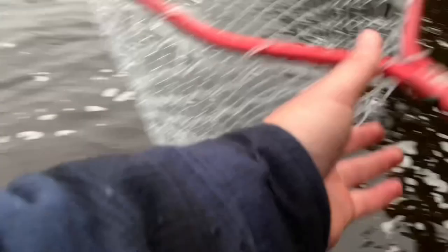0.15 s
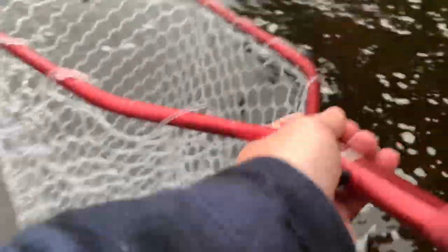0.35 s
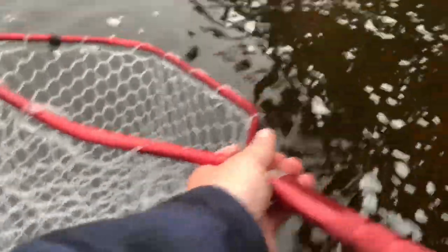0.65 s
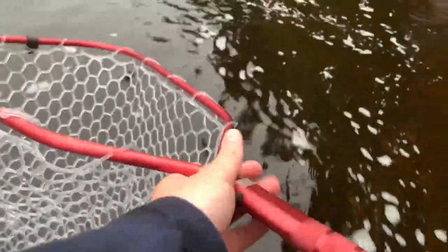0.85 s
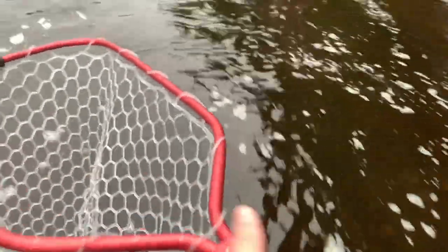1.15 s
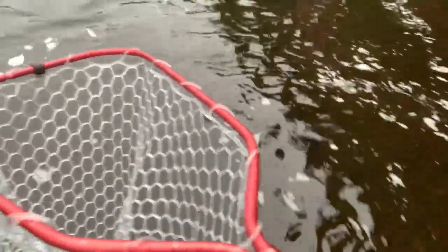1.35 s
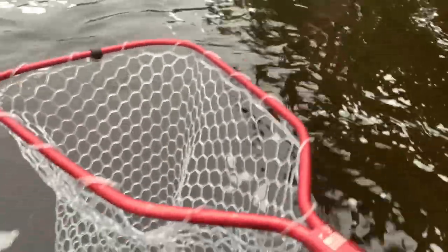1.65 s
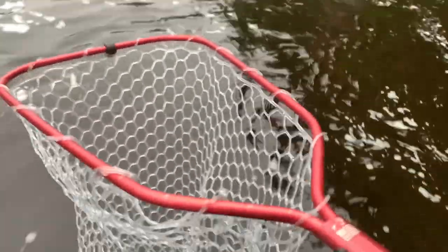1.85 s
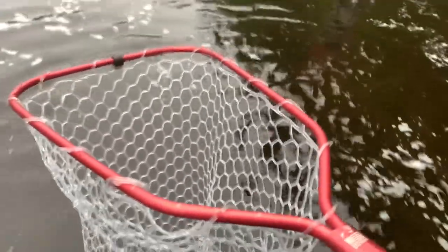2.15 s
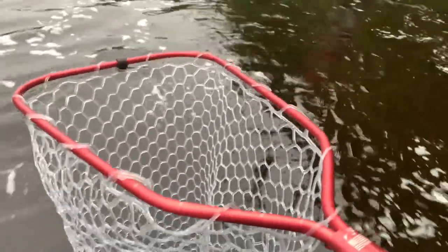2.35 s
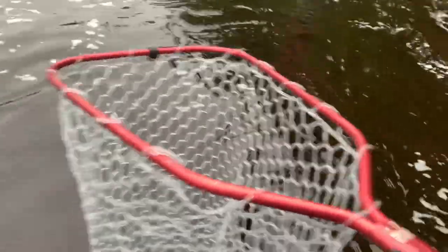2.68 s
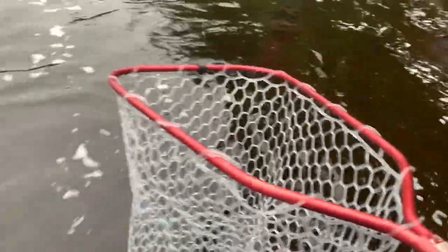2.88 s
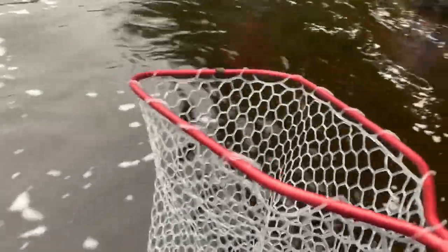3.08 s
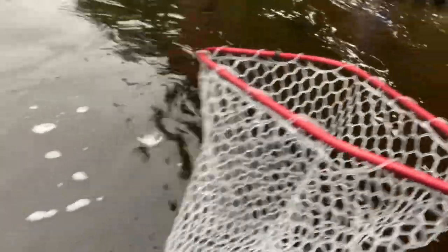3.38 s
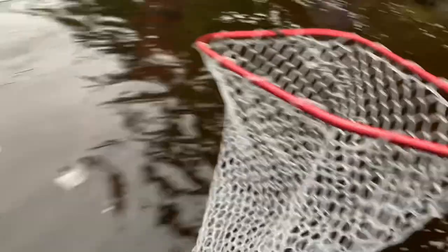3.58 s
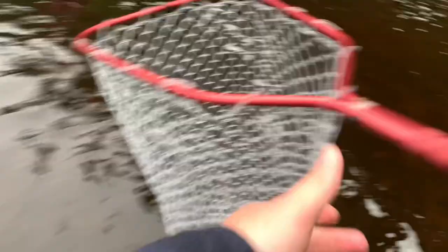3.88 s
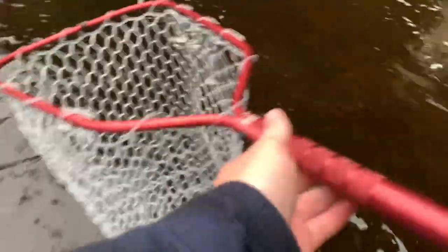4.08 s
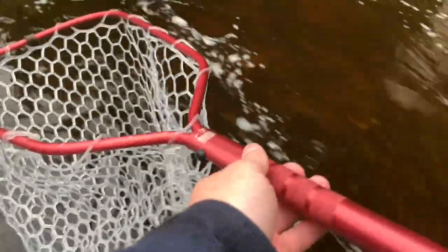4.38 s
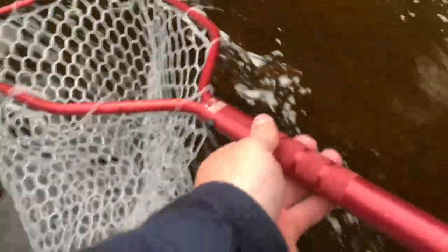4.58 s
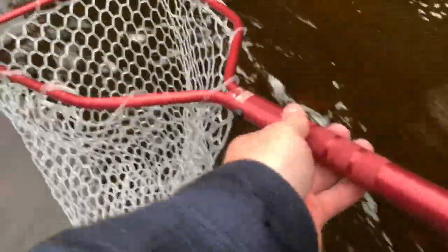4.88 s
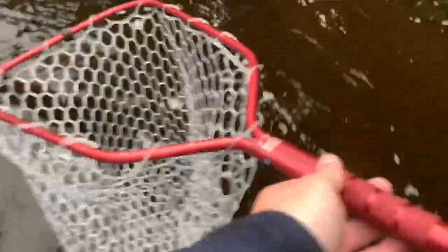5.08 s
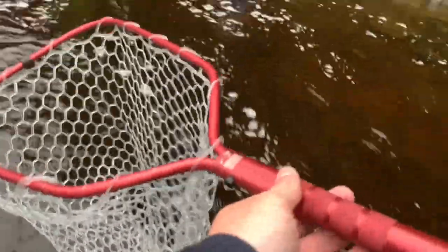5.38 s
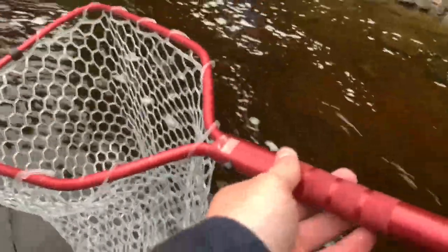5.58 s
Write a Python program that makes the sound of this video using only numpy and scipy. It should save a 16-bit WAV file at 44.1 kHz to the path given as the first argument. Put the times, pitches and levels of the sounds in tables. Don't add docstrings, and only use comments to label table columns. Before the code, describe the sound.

Outdoors at a river, very close to a camera microphone, the current roars low and lumpy without pause. Sleeve and wet mesh rustle, drops plop, and one hollow handle knock lands early, followed by tiny metallic pings. A quieter dripping stretch leads to a loud cluster of knocks and cracks, then churning water with snapping splashes and low gulps.

```python
import sys
import numpy as np
from scipy import signal
from scipy.fft import rfft, irfft, next_fast_len
from scipy.io import wavfile
from scipy.ndimage import uniform_filter1d, minimum_filter1d, map_coordinates

SR = 44100
rng = np.random.default_rng(int(sys.argv[2]) if len(sys.argv) > 2 else 0)


def digitize_waveform(pressure):
    field = np.atleast_2d(pressure).T
    bounded = np.clip(field, -1, 1)
    quanta = np.round(bounded * 32767).astype(np.int16)
    wavfile.write(sys.argv[1], SR, quanta)


def makeup_ratio(level_db):
    decades = np.asarray(level_db, float) / 20
    return 10 ** decades


N = 253134


def unit(x):
    return x / np.sqrt(np.mean(x ** 2) + 1e-20)


def along(points, hz):
    f, v = np.transpose(points)
    return np.interp(np.log(hz + 1), np.log(f + 1), v)


def curves(rows):
    s, *cols = np.transpose(rows)
    return [np.interp(np.arange(N) / SR, s, c) for c in cols]


def wobble(rate):
    return map_coordinates(rng.standard_normal(int(N * rate / SR) + 4), [np.arange(N) * rate / SR])


def filtered(x, response):
    m = next_fast_len(N + SR // 2)
    return irfft(rfft(x, m) * response(np.fft.rfftfreq(m, 1 / SR)), m)[..., :N]


def lead(hz, seconds):
    return np.exp(1j * np.pi * hz * seconds * np.array([[1], [-1]]))


def both_db(a_db, b_db):
    return 10 * np.log10(makeup_ratio(2 * a_db) + makeup_ratio(2 * b_db))


def add(track, s, sound, pan_db):
    at = round(s * SR)
    track[:, at:at + len(sound)] += (sound * makeup_ratio([[pan_db / 2], [-pan_db / 2]]))[:, :N - at]


# (frequency [Hz], correlation [-1..1])
ALIKE = [(50, 0.85), (130, 0.99), (290, 0.91), (640, 0.34), (1400, 0.75), (3000, -0.15), (4500, -0.25),
         (16000, 0.55)]


def rush(spectrum, patchy_db, grains=0, spread_db=0, share=0, left_first=0):
    z = signal.stft(rng.standard_normal((2, N)), nperseg=512)[2]
    field = uniform_filter1d(uniform_filter1d(rng.standard_normal(z.shape[1:]), 6, 0), 8, 1)
    pair = unit(signal.istft(z * makeup_ratio(patchy_db * unit(field)), nperseg=512)[1][:, :N])
    sizes = makeup_ratio(spread_db * np.minimum(rng.exponential(size=N), 3.5))
    spikes = (rng.random(N) < grains / SR) * sizes
    pair = pair + share * unit(spikes * rng.standard_normal((2, N)))

    def turn(hz):
        return np.arccos(np.clip(along(ALIKE, hz), -1, 1)) / 2

    mid, side = filtered(pair, lambda hz: makeup_ratio(along(spectrum, hz)) * [np.cos(turn(hz)), np.sin(turn(hz))])
    return unit(filtered(np.array([mid + side, mid - side]), lambda hz: lead(hz, left_first)))


def bubbles(count, centre_hz, cycles, spread_db, size=640, scatter=0.519):
    when, side, bulk = rng.random((3, count))
    hz = np.clip(centre_hz * np.exp(scatter * rng.standard_normal(count)), 250, 9000)[:, None]
    t = np.arange(size) / SR
    age = t * hz / cycles
    rings = age * np.exp(-3 * age) * np.sin(2 * np.pi * hz * t * (1 + 0.074 * age))
    grains = makeup_ratio(-spread_db * np.log(bulk + 0.095))[:, None] * rings
    at = ((when * N).astype(int)[:, None] + np.arange(len(t))).ravel()
    sides = [np.bincount(at, (grains * w[:, None]).ravel(), N + len(t))[:N] for w in (0.21 + side, 1.3 - side)]
    return unit(np.array(sides))


def rising_bubbles(rows, rise):
    out, t = np.zeros((2, N)), np.arange(SR // 8) / SR
    for s, db, hz, t60 in rows:
        turns = hz * (t + rise * t * t / t60)
        envelope = makeup_ratio(db + 0.5 - 60 * t / t60) * (1 - np.exp(-t / 0.00062))
        add(out, s, envelope * np.sin(2 * np.pi * turns), pan_db=1.5)
    return out


def clicks(rows, gain_db, width):
    out, t = np.zeros((2, N)), np.arange(2048) / SR
    f = np.fft.rfftfreq(len(t), 1 / SR)
    for s, db, hz, t60, pan_db in rows:
        band = width * hz * np.sqrt(hz / 4000)
        burst = makeup_ratio(-60 * t / t60) * (1 - np.exp(-t / 0.00063)) * rng.standard_normal(len(t))
        burst = irfft(rfft(burst) * (1j * f * band / (hz * hz - f * f + 1j * f * band)) ** 2)
        add(out, s, makeup_ratio(db + gain_db) * burst / np.abs(burst).max(), np.clip(pan_db, -7, 7))
    return out


# (time [s], strength [dB])
STIR = [(0, -43.5), (.3, -41), (.48, -47.5), (.75, -42), (1.05, -42), (1.4, -43), (2.09, -48), (2.4, -46),
        (2.59, -45), (2.95, -47.5), (3.29, -45), (3.5, -39.5), (3.69, -41), (3.9, -40.5), (4.1, -38),
        (4.8, -36), (5.35, -38.5), (5.74, -36.5)]
# (peak time [s], strength [dB], rise [s per 10 dB], fall [s per 10 dB])
SURGES = [(.09, -40, 0.065, .08), (0.2, -35.5, 0.054, 0.08), (.27, -41.5, 0.054, 0), (.93, -36, 0.2, -0.01),
          (4.425, -30.5, 0.11, 0.23), (4.57, -32, 0.12, 0.09), (4.69, -34.5, 0.046, 0.13),
          (5.04, -31, 0.089, 0.2), (5.136, -28.5, 0.082, 0.08), (5.24, -39, 0.027, 0.02),
          (5.41, -34, 0.083, 0.1)]


def stirring():
    t, (level_db,) = np.arange(N) / SR, curves(STIR)
    surges = 0
    for s, db, rise, fall in SURGES:
        surges = surges + makeup_ratio(2 * np.interp(t, [s - 3 * rise, s, s + 3 * fall], [db - 30, db, db - 30]))
    return 10 * np.log10(makeup_ratio(2 * level_db) + surges) + 35


# (time [s], level [dB])
CURRENT = [(0, -32), (.25, -30.5), (.38, -32), (.6, -32), (.95, -35.5), (1.79, -31.5), (3.05, -33),
           (3.64, -33.5), (4.2, -36), (4.85, -33.5), (5.13, -29), (5.33, -33), (5.74, -31.5)]
# (frequency [Hz], density [dB per Hz])
RUMBLE = [(13, -62), (22, -46), (52, -4.5), (184, 0.5), (354, -7), (432, -11), (594, -16), (646, -19),
          (918, -27.5), (1200, -23.5), (1560, -27), (2640, -120)]
# (frequency [Hz], density [dB per Hz])
BODY = [(120, -42), (220, 4.5), (330, 3.5), (480, -1), (700, -8), (1200, -63.5)]


def river():
    current_db, = curves(CURRENT)
    low_db = current_db + 0.5
    drag_db = -39.5 + 1.85 * stirring()
    body_db = both_db(current_db - 3.5, drag_db)
    tumble = makeup_ratio(0.12 * wobble(7) + 1.1 * wobble(35))
    low = unit(tumble * rush(RUMBLE, patchy_db=-1.0, left_first=0.00037))
    lumps = makeup_ratio(.8 * wobble(14) + 1.8 * wobble(40))
    body = rush(BODY, patchy_db=4.0, grains=300, spread_db=3.5, share=0.89, left_first=0.000097)
    return makeup_ratio(low_db) * low + makeup_ratio(body_db) * unit(lumps * body) * makeup_ratio([[.9], [-.9]])


# (time [s], strength [dB])
RUB = [(0.0, -54), (.36, -55.5), (.41, -48), (0.73, -48.5), (.82, -57.5), (1.18, -53), (1.37, -60),
       (1.84, -59.5), (2.06, -65.5), (2.3, -60.5), (3.02, -59), (3.58, -51.5), (4.08, -51.5), (4.59, -47),
       (4.73, -51.5), (5.31, -50.5), (5.5, -52), (5.74, -53.5)]
# (time [s], level [dB])
TRICKLE = [(0, -6), (.35, -4), (1, -8), (2.2, -11), (2.5, -7), (2.8, -8), (3.3, -9), (3.55, -3.5),
           (3.75, -9), (4, -9.5), (5.74, -13.5)]
# (frequency [Hz], density [dB per Hz])
SWISH = [(150, -51), (300, 0), (500, -1.5), (900, -2), (1500, -9.5), (2400, -15.5), (4000, -78)]
SCRATCH = [(1200, 1.5), (2200, 2), (2900, 2), (4000, 1.5), (4700, -1), (5500, -8.5), (7000, -10),
           (9000, -52)]
HISS = [(4500, -20.5), (6500, -9), (7700, -10), (9000, -2.5), (11000, -9.5), (14000, -6.5), (15800, -10),
        (16400, -44)]


def rustle():
    stir_db, rub_db = stirring(), curves(RUB)[0] + 50
    swish_db = -35.5 + 1.26 * stir_db
    scratch_db = -40.5 + 0.94 * stir_db + 0.46 * rub_db
    hiss_db = -46 + 1.25 * rub_db + 0.57 * stir_db
    clumps = .15 * wobble(16) + .8 * wobble(60)

    swish = rush(SWISH, patchy_db=3.0, grains=420, spread_db=7, share=0.19, left_first=.00008)
    swish = swish + 0.41 * bubbles(count=1500, centre_hz=1090, cycles=4.2, spread_db=2.5)
    trickle = bubbles(count=750, centre_hz=1220, cycles=11.1, spread_db=1.5, size=900, scatter=0.251)
    swish = swish + makeup_ratio(curves(TRICKLE)[0]) * trickle
    scratch = rush(SCRATCH, patchy_db=1.3, grains=500, spread_db=3.5, share=0.4)
    scratch = scratch + 0.35 * bubbles(count=4000, centre_hz=3460, cycles=4.8, spread_db=0.0)
    hiss = rush(HISS, patchy_db=1.7, grains=900, spread_db=3, share=0.3)

    swish_db = swish_db + 2.0 + .8 * clumps
    scratch_db = scratch_db + 4.0 + clumps + 1.27 * wobble(25.01)
    hiss_db = hiss_db + 7.0 + 1.9 * clumps + 2.4 * wobble(14) + 0.16 * wobble(3.07)
    return makeup_ratio(swish_db) * swish * makeup_ratio([[.6], [-.6]]) + makeup_ratio(scratch_db) * scratch + makeup_ratio(hiss_db) * hiss


# (time [s], peak [dB], bubble pitch [Hz])
DROPS = [(0.047, -26.5, 1330), (0.116, -27, 920), (.219, -38, 890), (0.255, -26, 1040), (0.348, -28, 1350),
         (0.495, -22, 320), (0.636, -18, 490), (4.016, -22, 1304), (0.92, -26, 1145), (1.178, -20, 1570),
         (1.213, -28, 614), (1.77, -30.5, 1010), (2.258, -35, 1270), (3.12, -36.5, 1970), (2.427, -29, 860),
         (2.474, -31, 1010), (2.574, -30, 950), (2.618, -39, 1130), (2.68, -29, 363), (3.237, -31.5, 1749),
         (3.274, -29, 1120), (3.34, -26, 1366), (3.418, -29, 1261), (3.499, -29, 1130), (3.542, -27, 1210),
         (3.665, -26, 1240), (4.558, -18, 504), (4.687, -15, 368), (5.589, -31, 357), (5.708, -26, 1530),
         (2.3, -47, 837), (2.352, -44, 1300), (2.38, -38.5, 1340), (2.54, -37, 1090), (2.585, -26.5, 715),
         (2.754, -39, 1050), (2.917, -47, 870), (3.202, -46, 1270), (3.24, -31, 606), (3.314, -36, 756),
         (3.636, -33, 1330), (0.189, -28, 1040), (.22, -30, 1890), (.3, -28, 910), (.795, -31, 1330),
         (.89, -31, 1110), (0.994, -38, 1450)]


def drops():
    return rising_bubbles([(s, db, hz, 0.038) for s, db, hz in DROPS], rise=0.18)


# (time [s], peak [dB], centre [Hz], pan [dB])
SPRAY = [(.0625, -24, 7500, 7), (1.059, -48, 7650, -4), (1.1004, -22.5, 9100, 7), (1.11, -39, 7800, 4),
         (1.1772, -24, 7850, -8), (1.3159, -27, 11000, 2.5), (1.3518, -30.5, 11000, 7),
         (1.8328, -30, 10200, 0), (1.9385, -35, 12000, 8), (2.3471, -28, 10000, 5), (2.718, -32, 10300, 3),
         (2.9025, -35, 9680, 8), (3.1133, -29, 10200, 2), (4.343, -18, 7200, -12),
         (4.8115, -34, 15200, 1.2), (5.0667, -14, 9500, 7), (5.4904, -26, 7570, -6),
         (5.5767, -31, 15500, -11)]


def spray():
    return clicks([(s, db, hz, 0.011, pan_db) for s, db, hz, pan_db in SPRAY], gain_db=-4, width=.38)


# (time [s], peak [dB], centre [Hz], pan [dB])
STRANDS = [(.0625, -26, 3200, 0), (.1216, -25, 2810, .5), (.2588, -33, 2200, 0), (0.3358, -29, 2060, 0),
           (.355, -36, 7200, 0), (.392, -36, 5030, 0), (0.4496, -31, 2400, 8), (.466, -30, 3280, 4),
           (0.5246, -28.5, 2020, -.5), (0.588, -36, 3030, 1.5), (.598, -42, 3870, 1),
           (.845, -35.5, 6400, -1.5), (0.877, -36, 1880, 2.5), (.8995, -31, 2630, 2.5),
           (.917, -26, 2000, 2), (.926, -35, 2500, 4), (.937, -29, 3700, 6), (.956, -29, 6100, 0.5),
           (.9924, -29, 1490, 0), (4.304, -17, 2380, 0), (4.395, -18, 4000, -2), (4.4145, -18, 1500, -3),
           (4.422, -19.5, 4670, -2), (4.483, -19, 4100, 0), (4.494, -17, 3530, 0), (4.558, -17.5, 3180, 4),
           (4.5811, -18, 1580, 9), (4.587, -22, 3800, 0), (4.6315, -26, 1740, 1), (5, -31, 4000, 0),
           (5.028, -24.5, 1700, 0), (5.079, -28, 2400, 0), (5.092, -29, 4120, -3), (5.121, -16, 1300, -4),
           (5.133, -18, 1500, -1.5), (5.137, -24, 4300, 0), (5.197, -21, 3900, 0), (5.228, -19, 1310, 3),
           (5.231, -21, 4300, -2), (3.617, -27, 1250, 1), (3.68, -25, 1510, 0), (3.605, -32, 1750, 1),
           (3.426, -32, 1699, -3)]


def strands():
    return clicks([(s, db, hz, 0.017, pan_db) for s, db, hz, pan_db in STRANDS], gain_db=-7, width=0.35)


# (time [s], peak [dB], pan [dB])
FLICKS = [(0.0735, -26, -3), (0.1441, -26, -2), (0.189, -33, 0.5), (0.203, -21, -8), (0.2203, -25.5, 4),
          (0.39, -29, 2), (0.9148, -27.5, -8), (1.041, -37, 0.5), (1.057, -28, -2), (1.4296, -51, -5),
          (1.6352, -37, 4), (1.7785, -33.5, 4), (2.0238, -40, 2), (2.2248, -58, -5), (2.805, -38, 1),
          (3.001, -34.5, 0.0), (3.1842, -33, 7), (3.4126, -29.5, 0.5), (3.79, -25, -8), (4.2494, -43, -0.5),
          (4.4902, -26, -3), (4.527, -34, 1.0), (4.914, -31, 7), (4.9575, -22.5, 7), (5.2689, -37, -5.5),
          (5.3174, -25, 0), (5.3776, -24.5, 3.5)]


def flicks():
    return clicks([(s, db, 11900, 0.0064, pan_db) for s, db, pan_db in FLICKS], gain_db=1, width=0.62)


# (time [s], peak [dB], pan [dB])
TICKS = [(.077, -25.5, 6), (0.103, -30, 7), (0.182, -23.5, 13), (0.208, -25, 7), (.2932, -32, 1),
         (0.473, -44, 8), (0.6158, -26, 7), (.7904, -43, -5), (0.897, -29, 9), (1.057, -21, -6),
         (1.214, -34, 12), (1.636, -33, -2.5), (1.7785, -52, 6), (2.0238, -38, 7), (2.33, -37, 8),
         (3.017, -31, 7), (3.1854, -35, 7), (3.4126, -30.5, 2), (4.2487, -25, -14), (4.3034, -31, -2),
         (4.378, -20, -2), (4.8943, -24, -3), (4.9587, -26, 7), (5.44, -26, 7)]


def ticks():
    rows = [(s, db, 3680 * np.exp(rng.normal(0, 0.13)), 0.011, pan_db) for s, db, pan_db in TICKS]
    return clicks(rows, gain_db=-4, width=.38)


# (time [s], peak [dB], start pitch [Hz], pitch sag time [s], t60 [s])
KNOCKS = [(.143, -18.5, 390, 0.016, 0.055), (.6966, -3.5, 860, 0.029, 0.013),
          (0.6998, -11, 436, 0.0041, 0.029), (3.7601, -1.5, 865, 0.0031, 0.15),
          (3.78, -5.5, 713, 0.0071, 0.07), (3.7929, 3.5, 634, 0.0082, 0.048),
          (3.8016, -7.5, 300, 0.0057, 0.36), (3.8184, -8, 605, 0.0123, 0.045),
          (3.8424, 1, 774, 0.0046, 0.032), (3.855, -16, 497, 0.0265, 0.17), (3.8658, 4.5, 398, 0.025, 0.02),
          (4.0187, -5, 840, 0.0058, 0.037), (4.025, -7.5, 460, 0.0127, 0.018),
          (4.042, -17, 460, 0.0046, 0.075), (4.417, -32, 880, 0.0048, 0.038),
          (4.608, -18.5, 400, 0.0055, 0.18), (5.14, -21, 490, 0.0033, 0.062),
          (5.176, -11, 392, 0.0046, 0.072), (5.531, -53, 350, 0.01, .074)]


def handle():
    out, t = np.zeros((2, N)), np.arange(SR // 6) / SR
    for s, db, hz, sag, t60 in KNOCKS:
        turns = 2 * hz * sag * (1 - (1 + t / sag) ** -.5)
        envelope = makeup_ratio(db + 4.5 - 60 * t / t60) * (1 - np.exp(-t / 0.00059)) ** 2
        add(out, s, envelope * np.sin(2 * np.pi * turns), pan_db=2.5)

    def bass_cut(f):
        return (1j * f / (50 + 1j * f)) ** 3 * -f * f / (42 ** 2 - f * f + 1.3j * 42 * f)

    return filtered(out, lambda f: bass_cut(f) * lead(f, -.00048))


# (time [s], peak [dB], t60 [s])
PINGS = [(.4, -42, 0.088), (.45, -57, 0.09), (.56, -56, .1), (.63, -44, 0.1), (.7, -46, 0.12),
         (1.0584, -35, 0.062), (1.1002, -27, 0.084), (1.1124, -39, 0.051), (1.1458, -43, 0.076),
         (1.177, -57, 0.07), (1.183, -46, 0.061), (5.4915, -14, 0.022)]
# (frequency [Hz], level [dB])
RING = [
    (7660, 12),
    (7600, -28),
    (8930, 4),
    (3640, -33),
]


def ring():
    out, t = np.zeros((2, N)), np.arange(SR // 5) / SR
    for s, db, t60 in PINGS:
        tone = sum(makeup_ratio(level + rng.normal(0, 0.54)) * np.sin(2 * np.pi * hz * t) for hz, level in RING)
        add(out, s, makeup_ratio(db - 10.5 - 60 * t / t60) * tone, 0)
    return out


# (time [s], peak [dB], centre [Hz], t60 [s])
CRACKS = [(3.7592, -11, 3800, 0.0047), (3.7815, -7.5, 2800, 0.015), (3.792, -7.5, 7500, 0.0055),
          (3.7973, -9, 2900, 0.0083), (3.8042, -17, 4000, 0.015), (3.8182, -19, 3400, 0.008),
          (3.8415, -28, 3700, 0.008), (3.7845, -15, 7000, .008), (3.7945, -15, 8700, 0.0043),
          (3.8005, -16, 3900, 0.0071), (0.49, -24, 2600, 0.0094),
          (3.9128, -24, 4100, .005) , (3.5, -25, 3500, .012), (3.864, -19, 3500, 0.037)]


def cracks():
    bursts = clicks([(*row, 7) for row in CRACKS], gain_db=0.4, width=1.0)
    return filtered(bursts, lambda hz: lead(hz, -.0004))


# (time [s], peak [dB], bubble pitch [Hz], t60 [s])
GLUG = [
    (3, -37, 1034, 0.148),
    (3.026, -31, 1176, 0.091),
]


def glug():
    return rising_bubbles(GLUG, rise=0.33)


# (time [s], peak [dB], centre [Hz], pan [dB])
SLAPS = [(3.759, -14.5, 790, 11), (3.782, -10.5, 805, -9), (3.79, -10.5, 1220, 10), (3.802, -6, 850, 4),
         (3.842, -17, 1450, 8), (3.863, -15.5, 840, 7), (4.018, -17, 627, 10), (4.418, -17, 910, -10),
         (5.05, -34, 865, -8), (5.099, -24, 904, -14), (5.139, -36, 1130, -31)]


def slaps():
    bursts = clicks([(s, db, hz, 0.035, pan_db) for s, db, hz, pan_db in SLAPS], gain_db=2.5, width=2.9)
    return filtered(bursts, lambda hz: lead(hz, -.0004))


# (time [s], peak [dB], pitch [Hz], t60 [s])
GULPS = [(4.286, -29.5, 384.2, 0.12), (4.371, -24, 343, 0.055), (4.415, -23.5, 367.6, 0.29),
         (4.464, -21, 346, 0.13), (4.74, -31, 336, 0.11), (4.792, -22.5, 276, 0.11),
         (4.845, -21.5, 295, 0.13), (4.928, -19.5, 356, 0.066), (4.971, -22.5, 202, 0.19),
         (5.005, -21, 416, 0.17), (5.035, -19.5, 368, 0.17), (5.073, -20.5, 128, 0.22),
         (5.24, -19.5, 422, 0.069), (5.382, -40, 276, .08)]


def gulps():
    return rising_bubbles(GULPS, rise=0.039)


# (frequency [Hz], t60 [s])
BANK = [(200, 0.031), (2000, 0.085), (10000, 0.0062)]


def echoes(x):
    hz, t, z = signal.stft(rng.standard_normal((2, SR // 4)), SR, nperseg=256)
    tail = signal.istft(z * makeup_ratio(-60 * t / along(BANK, hz)[:, None]), SR, nperseg=256)[1]
    return signal.fftconvolve(x, tail / np.linalg.norm(tail[0]), axes=1)[:, :N]


# (time [s], left over right [dB])
BEARING = [(0, 0), (.8, 0.5), (1.7, 1.8), (2.2, .5), (2.7, 2.1), (3.6, 1.4), (4.2, -0.5), (4.8, -0.3),
           (5.3, 0), (5.6, 0.2)]


def scene():
    wet = drops() + spray() + strands() + glug() + gulps()
    solid = flicks() + ticks() + handle() + ring() + cracks() + slaps()
    near = wet + solid
    turn_db = curves(BEARING)[0] * [[.5], [-.5]]
    return near + makeup_ratio(-11.5) * echoes(near) + makeup_ratio(turn_db) * (river() + rustle())


def gain_control(x):
    knee_db, squeeze, recover_s = -18.5, 0.25, 0.033
    keep = np.exp(-1 / (recover_s * SR))
    power = signal.lfilter([1 - keep], [1, -keep], np.mean(x ** 2, axis=0))
    return x * (1 + (power / makeup_ratio(2 * knee_db)) ** 2) ** (-squeeze / 2)


def thinned(x, under_db, scatter_db, jump):
    sum_and_difference = np.array([x[0] + x[1], x[0] - x[1]]) / 2
    hz, t, z = signal.stft(sum_and_difference, SR, nperseg=2048, noverlap=1536)
    band = np.arange(len(hz)) // 32
    power = np.add.reduceat(np.abs(z) ** 2, np.arange(0, len(hz), 32), axis=1)
    power = uniform_filter1d(power, size=3, axis=2)

    whim = unit(uniform_filter1d(rng.standard_normal(power.shape), size=4, axis=2))
    limit_db = under_db + 2.6 * (hz[::32, None] > 9800) + scatter_db * whim
    weaker = power < makeup_ratio(2 * limit_db) * power[::-1]
    faint = weaker[:, band] & (hz[:, None] > 6200)
    luck = uniform_filter1d(uniform_filter1d(rng.standard_normal(z.shape), size=8, axis=1), size=9, axis=2)
    faint = faint | (unit(luck) > 1.85) & (hz[:, None] > 2400)

    treble = uniform_filter1d(filtered(x[0], lambda f: f > 3000) ** 2, size=128)
    sudden = treble > jump * uniform_filter1d(treble, size=2048)
    widened = -minimum_filter1d(-1. * sudden, size=400)
    near_attack = widened[np.minimum((t * SR).astype(int), N - 1)] > 0
    bright = power[:, 20].sum(0)
    top = hz[:, None] > 15850 + 1100 * (near_attack & (bright > 9 * np.median(bright)))
    kept = z * ~(faint & ~near_attack | top)
    mid, side = signal.istft(kept, SR, nperseg=2048, noverlap=1536)[1][:, :N]
    return np.array([mid + side, mid - side])


def roll_off(x):
    return signal.sosfilt(signal.butter(12, 17020, fs=SR, output="sos"), x)


def record(dry):
    def joined(hz):
        return .9 / (1 + np.exp((6500 - hz) / 500))

    def turned(hz):
        return np.exp(2j * np.pi * (hz - 11080) / 4830)

    own = filtered(dry[1], lambda hz: np.sqrt(1 - joined(hz) ** 2))
    shared = filtered(dry[0], lambda hz: joined(hz) * turned(hz))
    ports = np.clip(gain_control(np.array([dry[0], own + shared])), -.92, .92)
    mix = thinned(ports, under_db=-5.2, scatter_db=1.3, jump=3.3)
    return roll_off(mix)


dry = scene()
out = record(dry)
digitize_waveform(out)
```